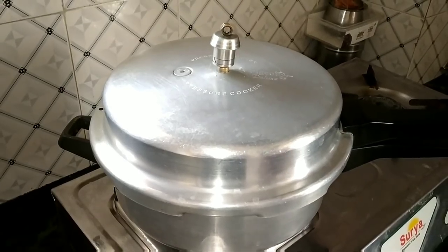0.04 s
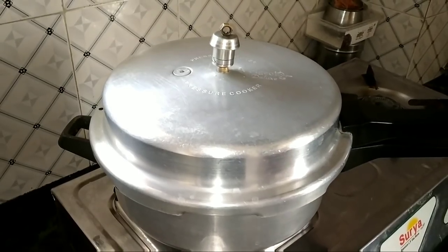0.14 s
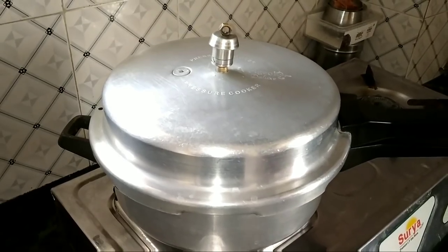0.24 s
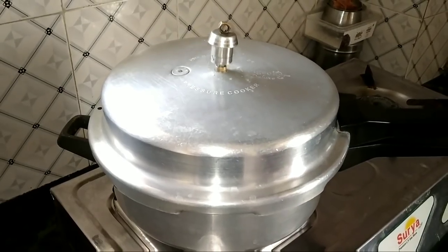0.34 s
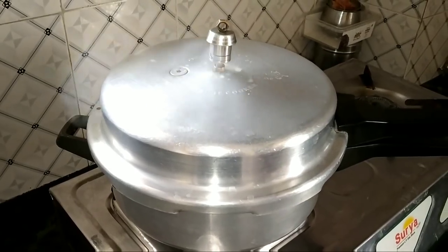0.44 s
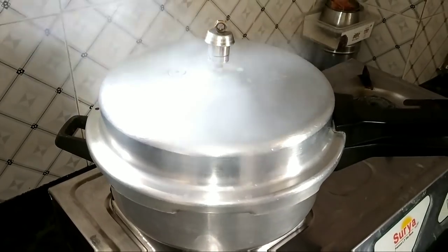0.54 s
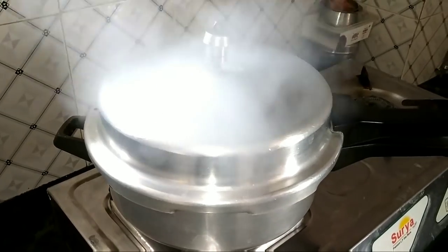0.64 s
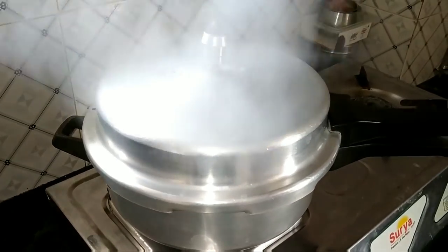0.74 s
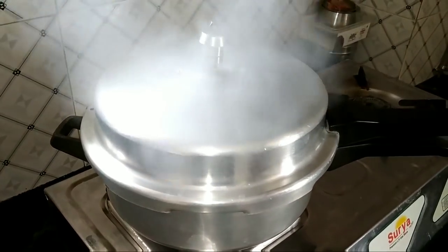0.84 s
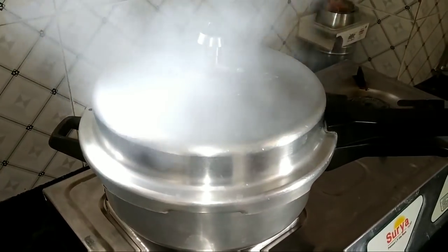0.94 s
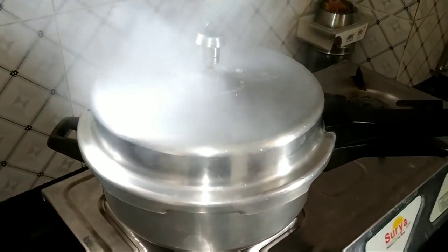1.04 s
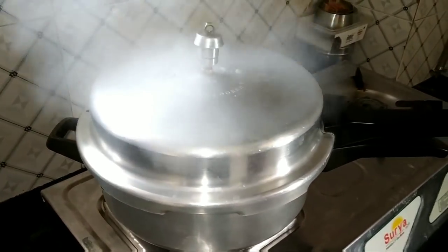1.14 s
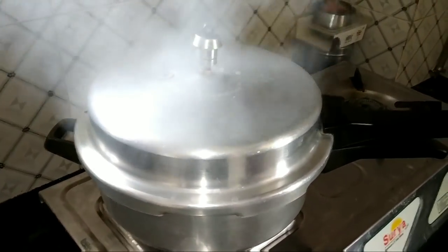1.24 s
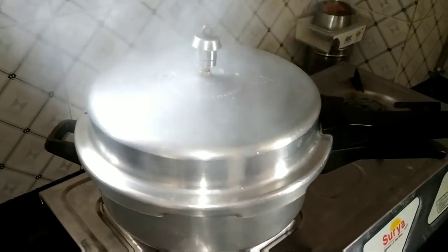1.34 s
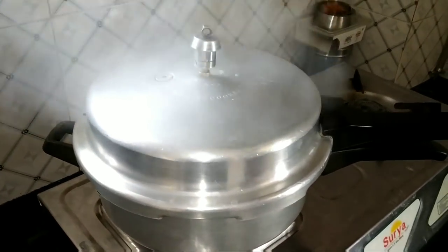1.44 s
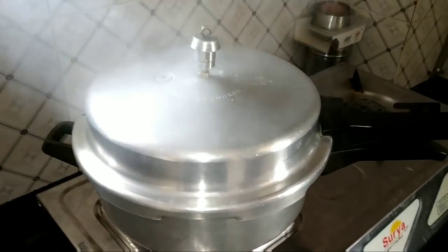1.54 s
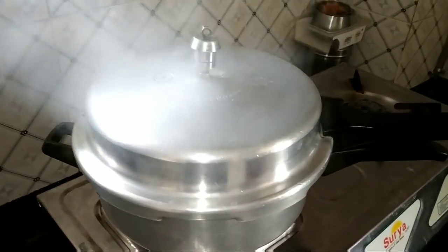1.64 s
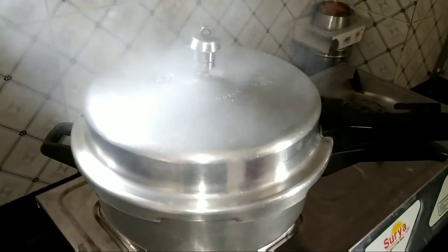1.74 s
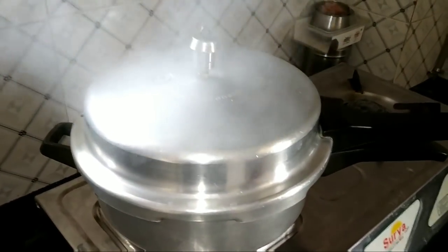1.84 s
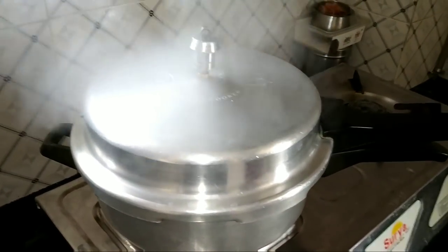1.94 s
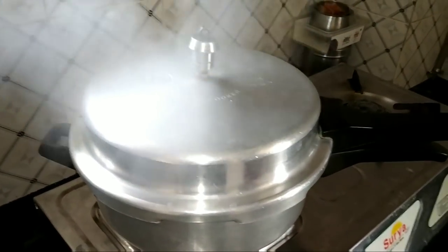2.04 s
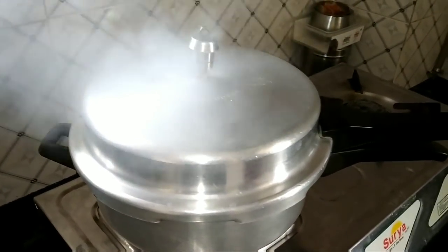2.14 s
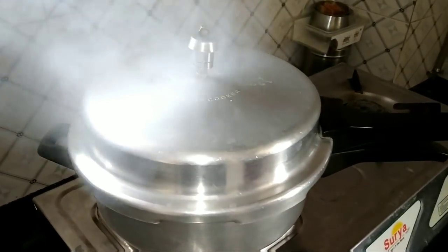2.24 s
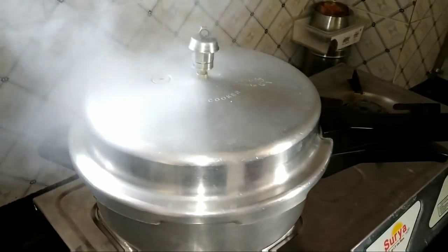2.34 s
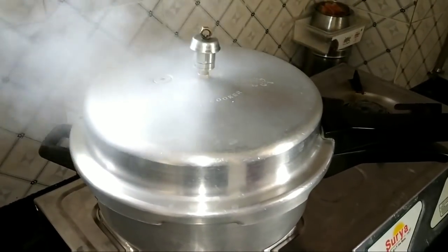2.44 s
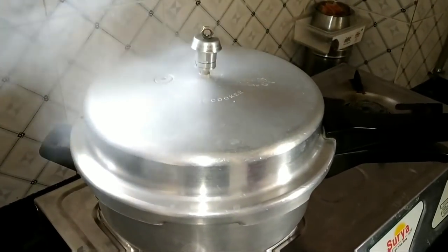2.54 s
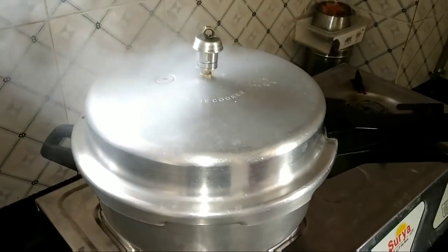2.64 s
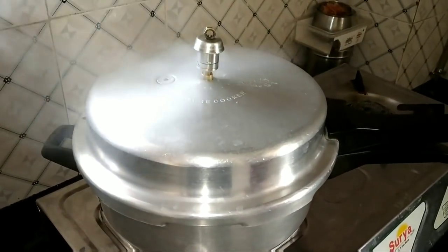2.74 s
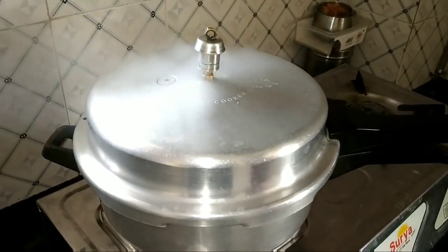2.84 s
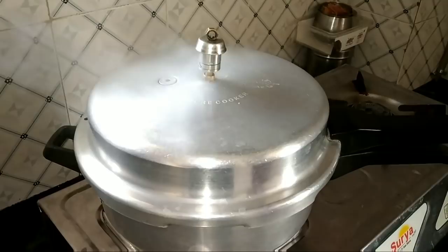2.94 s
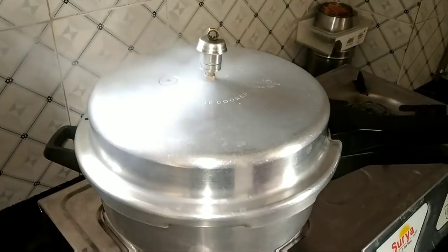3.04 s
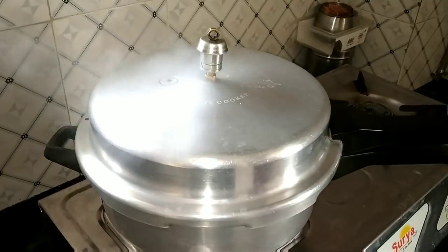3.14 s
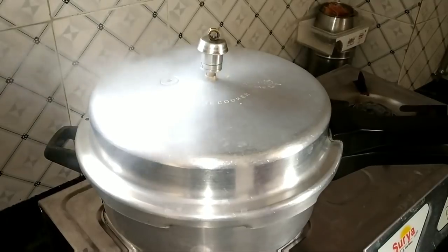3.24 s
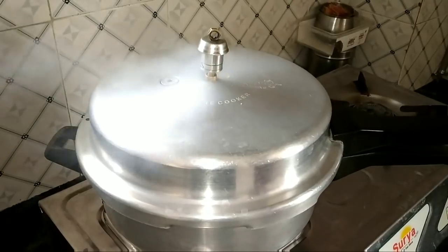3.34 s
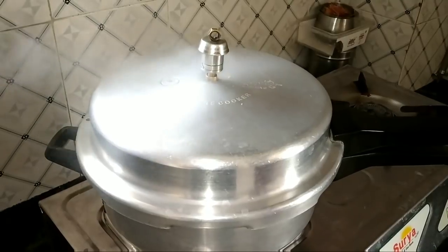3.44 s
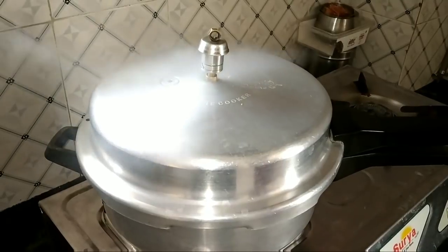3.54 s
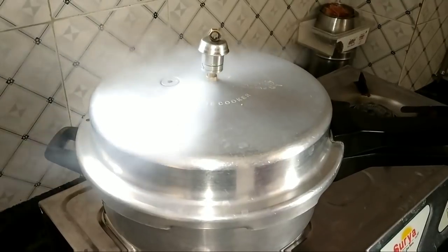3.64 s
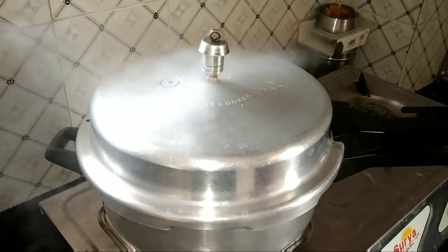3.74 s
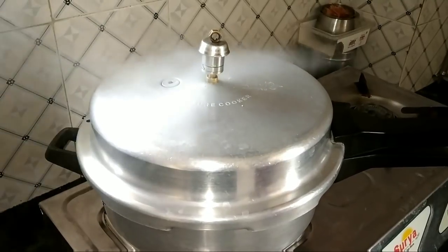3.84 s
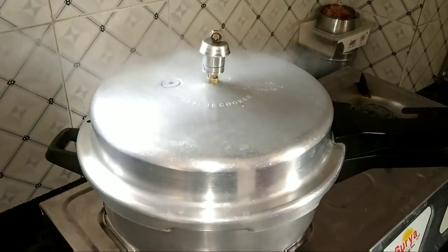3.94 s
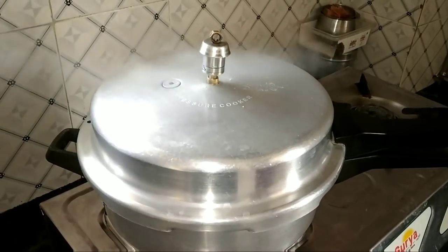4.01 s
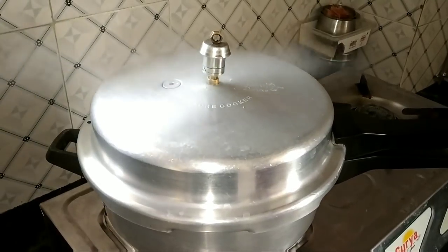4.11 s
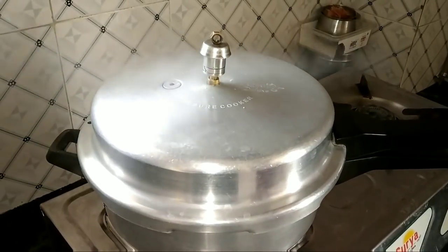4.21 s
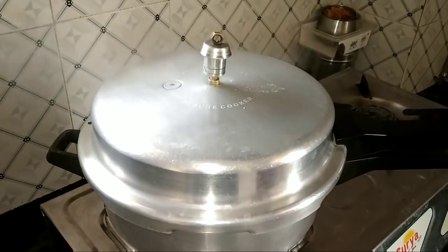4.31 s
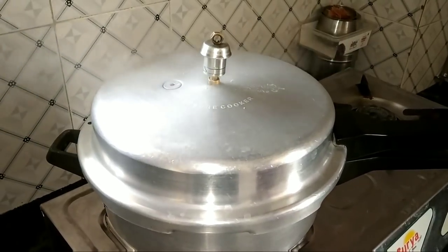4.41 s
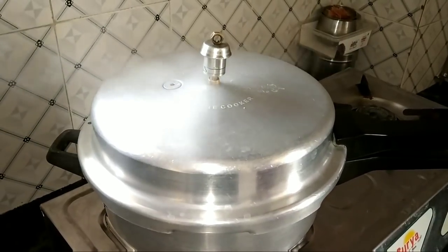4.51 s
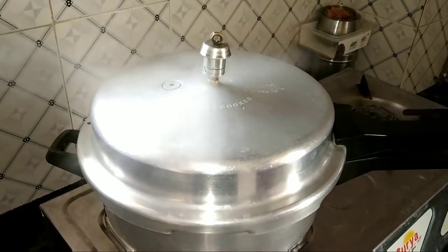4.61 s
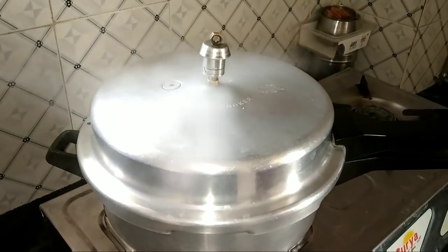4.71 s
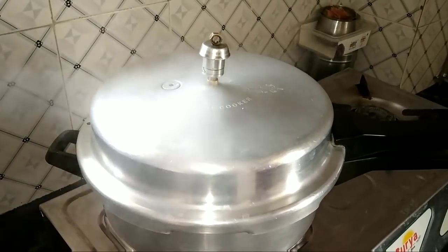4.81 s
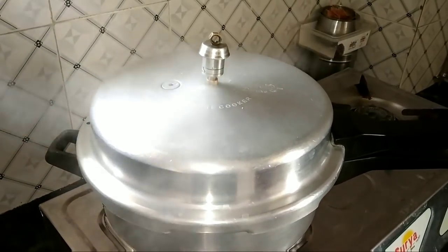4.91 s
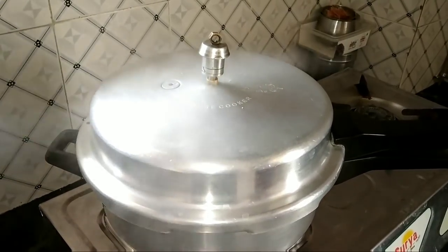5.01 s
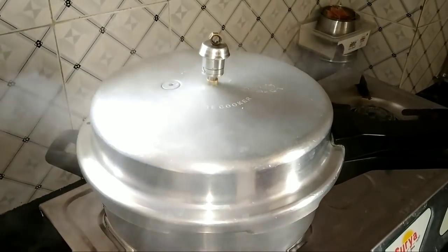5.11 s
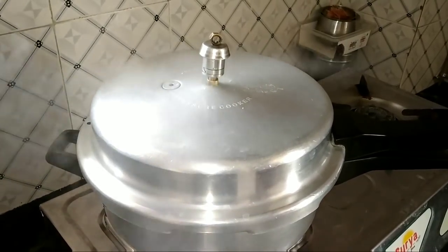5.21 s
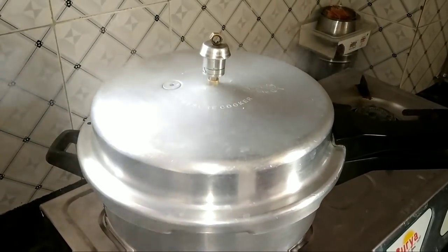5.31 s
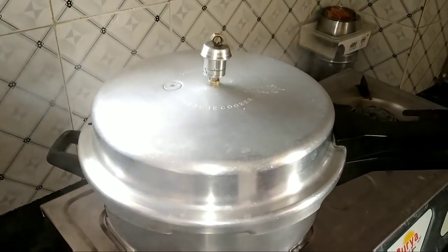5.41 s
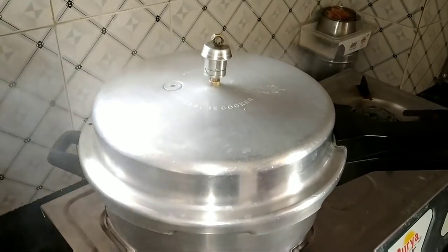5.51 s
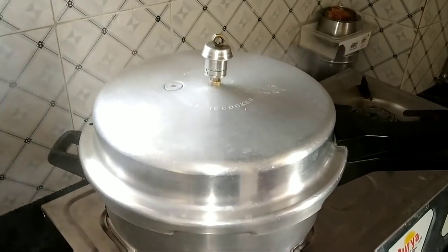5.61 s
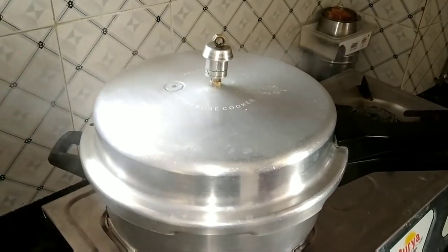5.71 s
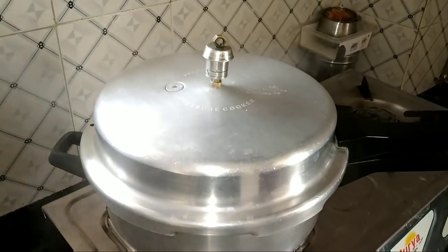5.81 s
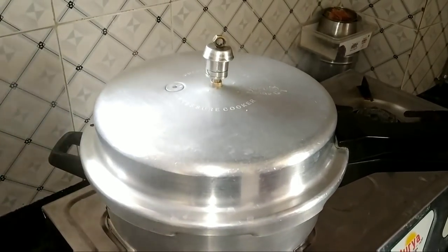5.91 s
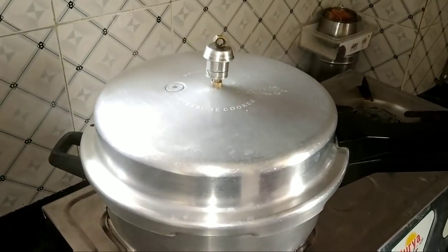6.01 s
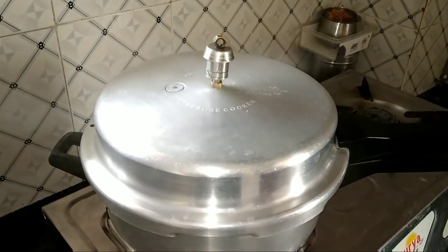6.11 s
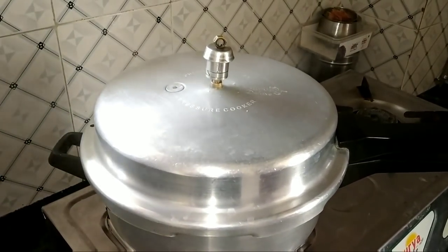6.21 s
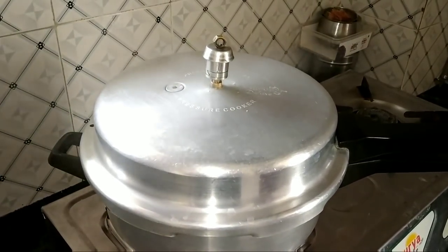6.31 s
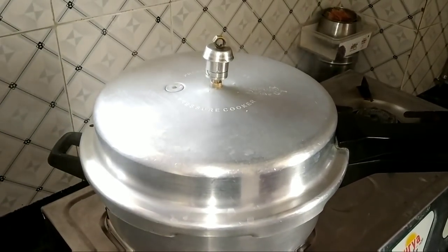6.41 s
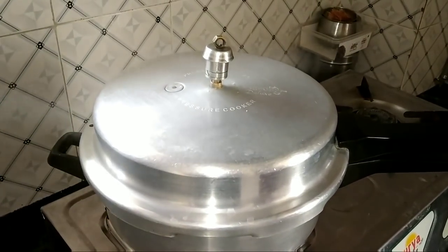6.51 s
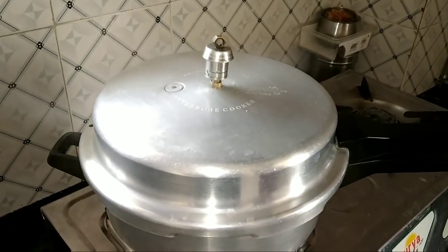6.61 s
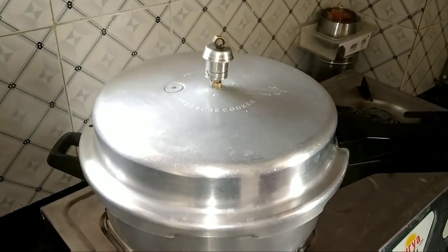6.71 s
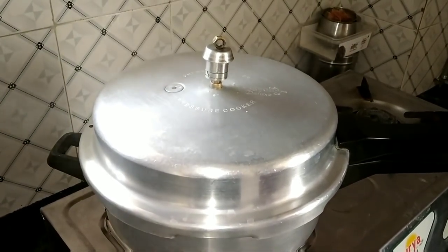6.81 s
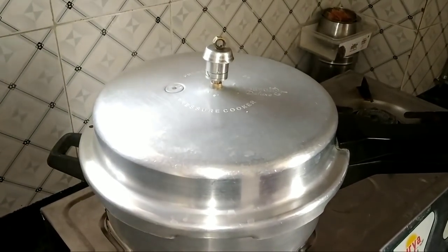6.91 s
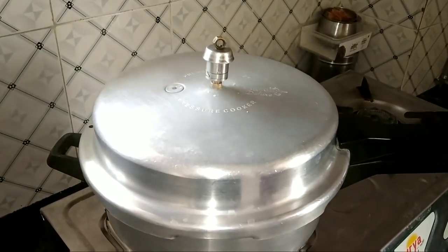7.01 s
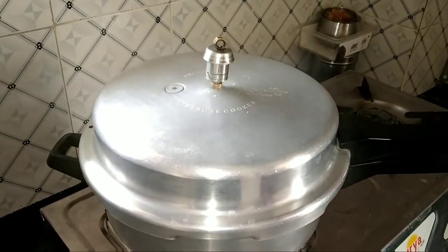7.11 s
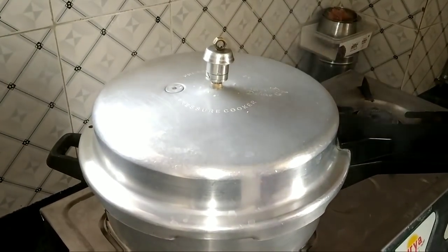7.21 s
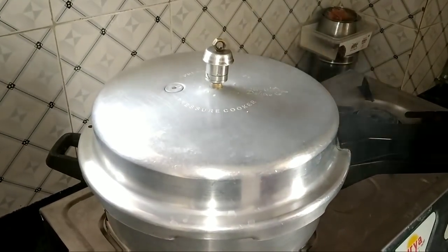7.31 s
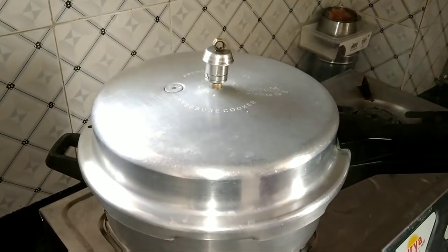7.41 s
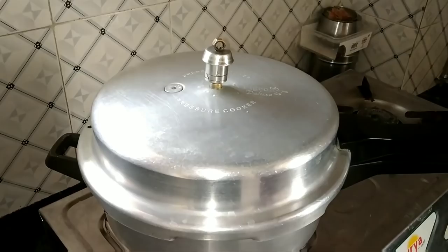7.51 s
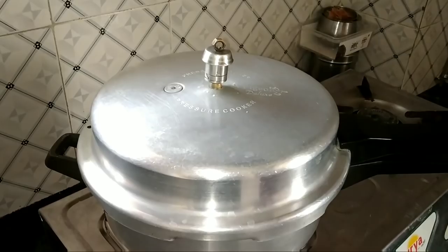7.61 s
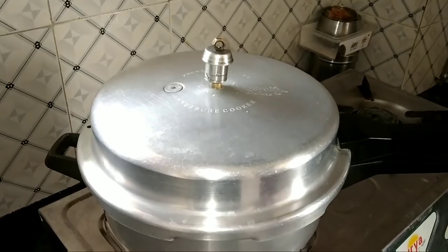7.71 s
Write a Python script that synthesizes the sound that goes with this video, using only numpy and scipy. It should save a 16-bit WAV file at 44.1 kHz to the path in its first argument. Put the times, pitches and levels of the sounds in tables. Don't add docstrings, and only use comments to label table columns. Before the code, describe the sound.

A faint burner roar and slight low hum under a pressure cooker open the scene, close to a phone in a tiled kitchen. Around 0.2 s steam begins to seep, and by 0.45 s the weight has lifted and a powerful turbulent jet erupts, bright, wide and sharp, drowning the kitchen. From 0.5 to about 5 s it stays nearly constant, with quick flutter and slow swaying; the overloaded microphones add rough, flat noise, dense and steady on the left, in short gusts on the right. From about 5.2 s the hiss gradually dulls and the distortion weakens. Near 7.3 s the flow collapses and the weight drops back: a short hollow knock around the middle pitches, leaning right, with the pot's metallic ring smeared by hard walls. A dull hiss lingers briefly, leaving a thin leak and returning burner roar until about 7.7 s.

```python
import sys
import numpy as np
from scipy import signal
from scipy.fft import rfft, irfft, dct
from scipy.io import wavfile
from scipy.ndimage import uniform_filter1d

SR = 44100
rng = np.random.default_rng(int(sys.argv[2]) if len(sys.argv) > 2 else 0)


def inscribe(sig):
    pcm = np.round(np.clip(np.atleast_2d(sig).T, -1, 1) * 32767)
    wavfile.write(sys.argv[1], SR, pcm.astype(np.int16))


def gain_from_db(level_db):
    decades = np.asarray(level_db, float) / 20
    return 10 ** decades


N = 341775

SIDES = np.array([[.5], [-.5]])
DROP_S = 7.342
TIRE_FROM_S, TIRE_BRIGHT_DB_PER_S = 5.2, -1.1


def colour(x, points):
    hz, db = np.transpose(points)
    f = np.arange(N // 2 + 1) * SR / N + 1
    return irfft(rfft(x) * gain_from_db(np.interp(np.log(f), np.log(hz), db, left=-60)), N)


def level(x, db):
    return x * gain_from_db(db) / np.sqrt(np.mean(x ** 2, axis=-1, keepdims=True))


def walk(rate):
    k = int(SR / rate)
    held = np.repeat(rng.standard_normal(N // k + 1), k)
    return 0.97 * uniform_filter1d(uniform_filter1d(held, k), k)[:N]


def ramp(start_s, length_s):
    return np.clip((np.arange(N) / SR - start_s) / length_s, 0, 1)


def plume():
    # time in seconds, level in dB.
    flow = [(0.0, -40), (0.19, -39), (0.25, -35.5), (0.33, -34.5), (0.45, -25.5), (0.62, -24.5),
            (1.0, -26.5), (2.4, -25.5), (2.9, -25), (4.35, -25.5), (4.8, -24.5), (6.5, -26.5),
            (7.25, -26.5), (7.32, -30), (7.38, -35), (7.49, -37), (7.62, -49), (7.75, -47.5)]
    seep_db, leak_db, open_db, full_db = -50.5, -44.5, -34, -25.5
    linger_s, edge_s = 0.17, 0.061
    t = np.arange(N) / SR
    db = np.interp(t, *np.transpose(flow))
    bright_db = np.interp(db, (leak_db, open_db), (-7.5, 1.5))
    pan_db = np.interp(db, (leak_db, open_db), (10.5, 2))
    body_db = np.interp(db, (seep_db, open_db, full_db), (4.5, 3.5, -1.65))
    tired_s = np.maximum(t - TIRE_FROM_S, 0) * (1 - ramp(DROP_S, edge_s))
    linger = ramp(DROP_S - 0.015, edge_s) - ramp(DROP_S + linger_s, edge_s)
    bright_db = bright_db + TIRE_BRIGHT_DB_PER_S * tired_s - 12 * linger
    body_db = body_db - 3 * linger
    pan_db = pan_db + 0.84 * tired_s
    sway_bright, sway_level, sway_pan = [size_db * walk(5.5) for size_db in (1.07, 0.12, 1.0)]
    return db + sway_level, bright_db + sway_bright, body_db, pan_db + sway_pan


def jet():
    # frequency in Hz, density in dB per Hz, extra left minus right in dB.
    jet_colour = [(720, -31, 1.5), (1500, -19.5, 2), (2310, -13.5, 1), (2984, -8.5, 4), (3570, -7, 0.5),
                  (4400, -7.5, 3), (5410, -6, -5), (7080, -2, 3.5), (7230, -2, -2), (8300, 1.5, 0.5),
                  (9550, 2.5, 4), (11750, 0.5, -1), (13400, -2.5, 3), (16200, 0.5, -0.5)]
    # frequency in Hz, level in dB under the whole jet.
    alike = [(700, -20), (4200, -12), (5300, -8), (6000, -1), (6800, -6), (10300, -6), (11000, -1.5),
             (12500, -4), (14300, -2.5), (15500, -4)]
    lag, lid_lag, tile_lag = 4, 11, 76
    hover_s, settle_s, hover_edge_s = 2.0, 6.3, 0.38
    dip_hz, dip_octaves, dip_db = 9570, 0.18, -2.5
    db, bright_db, body_db, pan_db = plume()
    common, left, right = rng.standard_normal((3, N))
    common = colour(common, alike)
    left = left + np.roll(common, lag) + .65 * np.roll(common, lid_lag)
    right = right + common + .7 * np.roll(common, tile_lag)
    hz, tone_db, side_db = np.transpose(jet_colour)
    ports = [colour(x, np.c_[hz, tone_db + s * side_db]) for x, s in zip((left, right), SIDES[:, 0])]
    spectrum = rfft(level(np.array(ports), 0))
    octave = np.log2(np.arange(N // 2 + 1) * SR / N + 1)
    centres = np.arange(11, 14.1, 1 / 4)
    hover_db = dip_db * (ramp(hover_s, hover_edge_s) - ramp(settle_s, hover_edge_s))
    out = 0
    for k, centre in enumerate(centres):
        band_dip_db = hover_db * np.exp(-((centre - np.log2(dip_hz)) / dip_octaves) ** 2)
        share = np.interp(octave, centres, np.arange(len(centres)) == k)
        band = irfft(spectrum * np.sqrt(share), N)
        top = np.clip((2 ** centre - 9000) / 3000, 0, 1)
        low = np.clip((6500 - 2 ** centre) / 2500, 0, 1)
        flicker_db = .6 * walk(7) + .9 * walk(25)
        out = out + band * gain_from_db(top * (bright_db - 1.2) + low * body_db + band_dip_db + flicker_db)
    return out * gain_from_db(db + 7.5 + SIDES * pan_db)


def residue_db():
    # time in seconds, lift in dB.
    bursts = [(0.46, 9), (0.6, 6.5), (0.84, 7.5), (1.15, 6), (1.53, 5), (1.95, 4.5), (2.3, 4.5), (2.49, 5),
              (3.15, 4), (3.51, 5), (3.8, 4.5), (4.13, 9), (4.84, 5), (5.24, 7), (5.5, -1)]
    burst_s, sag_from_s, sag_db_per_s2 = 0.07, 6.31, -8
    t = np.arange(N) / SR
    left = -41 + sag_db_per_s2 * np.maximum(t - sag_from_s, 0) ** 2 + 0.88 * walk(6.5)
    gusts = sum(db * np.exp(-((t - s) / burst_s) ** 2 / 2) for s, db in bursts)
    tired_db = 2.5 * TIRE_BRIGHT_DB_PER_S * np.maximum(t - TIRE_FROM_S, 0)
    right = left - 18 - 0.4 * t + tired_db + gusts
    shut_db = -30 * (1 - ramp(0.368, 0.05) + ramp(7.25, 0.16))
    return shut_db + np.array([left, right])


def overload():
    # frequency in Hz, density in dB per Hz.
    overload_colour = [(20, -21), (100, -18), (140, -16.5), (200, 0.5), (300, 1), (1500, 0), (3000, 0.5),
                       (5000, 0), (9000, -7), (15500, -2.5)]
    out = []
    # overload point in rms, unrest in dB of the unheard top of the jet
    for limit, surge_db in ((1.1, 0.09), (2.2, 1.07)):
        push = rng.standard_normal(N) * gain_from_db(surge_db * (.6 * walk(13) + 1.1 * walk(35)))
        out.append(colour(push - np.clip(push, -limit, limit), overload_colour))
    out[1] = out[1] + signal.sosfilt(signal.butter(2, 110, fs=SR, output="sos"), out[1])
    return level(np.array(out), 17.4) * gain_from_db(residue_db())


def drop():
    # frequency in Hz, level in dB, 60 dB decay time in seconds.
    pot = [(441, -30, 1.6), (608, -31, 0.35), (688, -23, 0.45), (790, -21, 0.35), (820, -27, 0.35),
           (872, -23, 0.45), (848, -21, 0.85), (915, -27, .35), (1172, -30, 0.4), (1235, -26, .4),
           (1305, -25, .45), (1740, -31, 0.34)]
    knock_hz, knock_rise_s, knock_t60_s = 840, 0.0014, 0.05
    pot_rise_s, room_t60_s = 0.025, 0.79
    t = np.arange(N - int(DROP_S * SR)) / SR
    partials = ((1, 1), (1.92, 0.12), (1.44, 0.15))
    knock = sum(size * np.sin(2 * np.pi * ratio * knock_hz * t) for ratio, size in partials)
    knock = knock * (1 - np.exp(-t / knock_rise_s)) * gain_from_db(-60 * t / knock_t60_s)
    phases = rng.uniform(0, 2 * np.pi, len(pot))
    ring = sum(gain_from_db(db - 60 * t / t60) * np.sin(2 * np.pi * hz * t + p)
               for (hz, db, t60), p in zip(pot, phases))
    blow = 2 * gain_from_db(-27.5) * (knock + (1 - np.exp(-t / pot_rise_s)) * ring)
    walls = rng.standard_normal((2, len(t))) * gain_from_db(-60 * t / room_t60_s) * np.clip(t / 0.014, 0, 1)
    walls[1] = 0.72 * walls[0] + 0.67 * walls[1]
    wet = [signal.fftconvolve(blow, w / np.linalg.norm(w))[:len(t)] for w in walls]
    both = (blow + gain_from_db(4) * np.array(wet)) * gain_from_db(SIDES * -5)
    return np.pad(both, ((0, 0), (N - len(t), 0)))


def duck_db(start_s, attack_s, depth_db, creep_db, end_s, release_s, after_db):
    held = depth_db * ramp(start_s, attack_s) + creep_db * np.maximum(np.arange(N) / SR - start_s, 0)
    free = ramp(end_s, release_s)
    return held * (1 - free) + after_db * free


def kitchen():
    # frequency in Hz, density in dB per Hz.
    burner = [(24, -81), (40, -53), (135, -26), (180, -10.5), (499, -13), (550, -15.5), (778, -17.5),
              (943, -13.5), (1470, -17.5), (4000, -25.5), (5200, -42), (8800, -120)]
    # frequency in Hz, level in dB.
    hum_partials = [(183, -64), (549, -53)]
    # start in seconds, attack in seconds, depth in dB,
    # creep in dB per second, letting go in seconds, release in seconds, level after in dB.
    duck_left = (0.2, 0.17, -15, 0.3, 7.34, 0.12, 1)
    duck_right = (0.38, 0.12, -11, -2.6, 7.29, 0.13, 3.5)
    alike_hz, hum_end_s = 885, 0.28
    t = np.arange(N) / SR
    mid, side = (colour(rng.standard_normal(N), [*burner, (16000, -21.5)]) for _ in range(2))
    high = signal.butter(2, alike_hz, "high", fs=SR, output="sos")
    side = signal.sosfilt(high, side) + 0.21 * side
    hum = sum(gain_from_db(db) * np.sqrt(2) * np.sin(2 * np.pi * hz * t + .3 * walk(3.3)) for hz, db in hum_partials)
    hum = hum * np.clip((hum_end_s - t) / 0.089, 0, 1)
    roar = (mid + 2 * SIDES * side) / np.std(mid) * gain_from_db(-45.5 + 2.7 * walk(12))
    return (roar + hum) * gain_from_db(np.array([duck_db(*duck_left), duck_db(*duck_right)]))


def starve(x):
    # frequency in Hz, step over band rms in dB,
    # share of bands held as sum and difference.
    steps = [(300, -24, 0), (800, -17, 0), (1200, -11, 0), (1650, -5, 0), (2250, 1, 0), (3000, 4.5, 0),
             (3700, 6, .1), (4400, 7.5, .6), (5200, 9, .9), (6300, 7.5, .9), (7600, 3.5, .9),
             (9400, 1.5, .9), (11500, -1.5, .9), (13500, 1.5, .9), (15500, 2.5, .9)]
    frame, grid, width = 1024, 162, 16
    masking, relief = .7, .035
    pad = frame - grid
    window = np.sin(np.pi * (np.arange(2 * frame) + .5) / (2 * frame))
    blocks = np.pad(x, ((0, 0), (pad + frame, 2 * frame - (pad + N) % frame))).reshape(2, -1, frame)
    lapped = np.concatenate([blocks[:, :-1], blocks[:, 1:]], axis=2) * window
    a, b, c, d = np.split(lapped, 4, axis=2)
    folded = np.concatenate([-c[..., ::-1] - d, a - b[..., ::-1]], axis=2)
    lines = dct(folded, 4, norm="ortho").reshape(2, -1, frame // width, width)
    hz, step_db, joint = np.transpose(steps)
    band_hz = (np.arange(frame // width)[:, None] + .5) * width * SR / (2 * frame)
    joined = rng.random(lines.shape[1:3] + (1,)) < np.interp(band_hz, hz, joint)

    def turn(v):
        return np.where(joined, np.array([v[0] + v[1], v[0] - v[1]]) / np.sqrt(2), v)

    lines = turn(lines)
    power = uniform_filter1d((lines ** 2).mean(axis=3, keepdims=True), size=5, axis=1) + 1e-18
    rms = np.sqrt(power ** (1 - masking) * power.max(axis=0) ** masking)
    loudness = power.sum(axis=(0, 2), keepdims=True)
    rms = rms * (loudness / np.median(loudness)) ** relief
    wander = np.sqrt(3) * uniform_filter1d(rng.standard_normal(rms.shape), size=3, axis=1)
    scatter_db = 3.0 + np.interp(band_hz, hz, np.maximum(step_db, 0)) / 4
    step = rms * gain_from_db(np.interp(band_hz, hz, step_db) + scatter_db * wander)
    size = np.floor((np.abs(lines) / step) ** .75 + .4054) ** (4 / 3)
    rounded = turn(np.sign(lines) * step * size)
    u, v = np.split(dct(rounded.reshape(2, -1, frame), 4, norm="ortho"), 2, axis=2)
    unfolded = np.concatenate([v, -v[..., ::-1], -u[..., ::-1], -u], axis=2) * window
    head, tail = np.split(unfolded, 2, axis=2)
    return (tail[:, :-1] + head[:, 1:]).reshape(2, -1)[:, pad:pad + N]


def scene():
    return jet() + overload() + drop() + kitchen()


def band_limit(x):
    return signal.sosfilt(signal.butter(12, 15510, fs=SR, output="sos"), x)


def record(dry):
    peak = .52
    rounded = dry / (1 + (dry / peak) ** 6) ** (1 / 6)
    mix = starve(rounded)
    return band_limit(mix)


dry = scene()
out = record(dry)
inscribe(out)
```